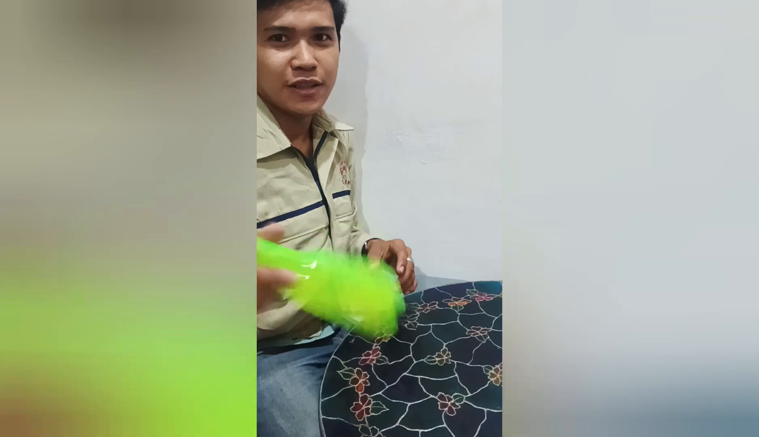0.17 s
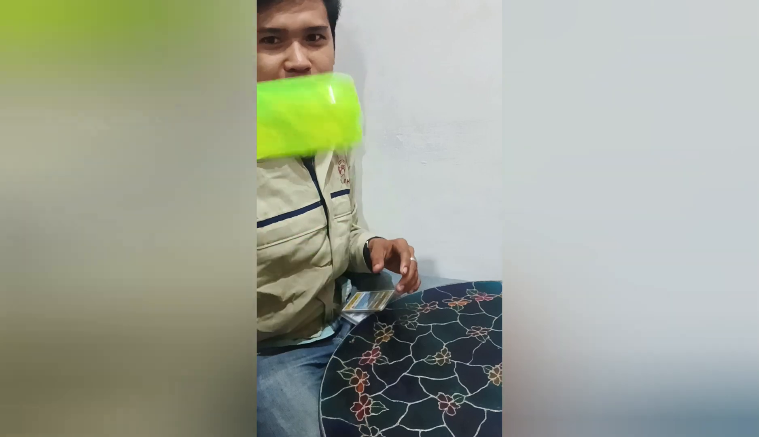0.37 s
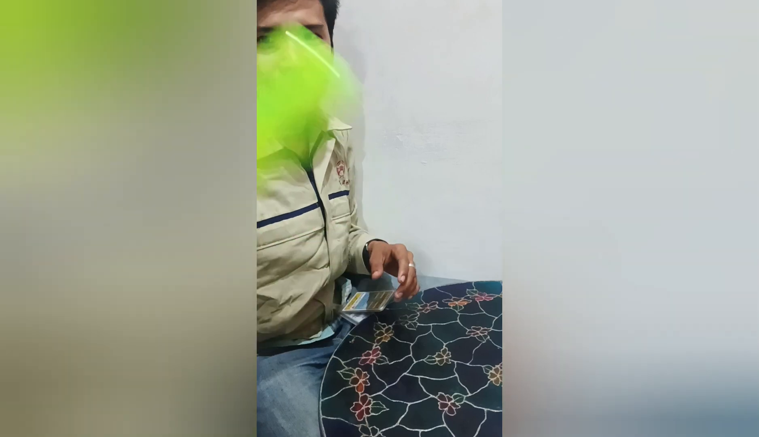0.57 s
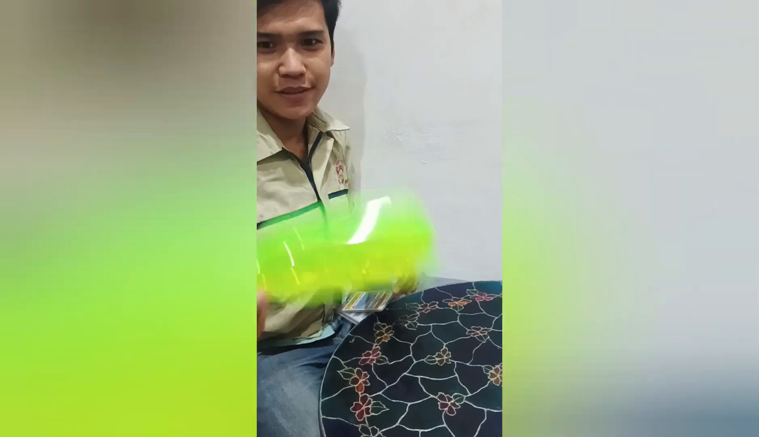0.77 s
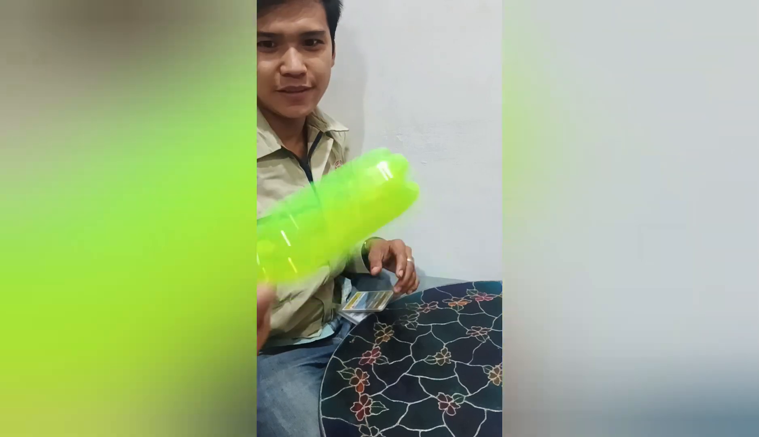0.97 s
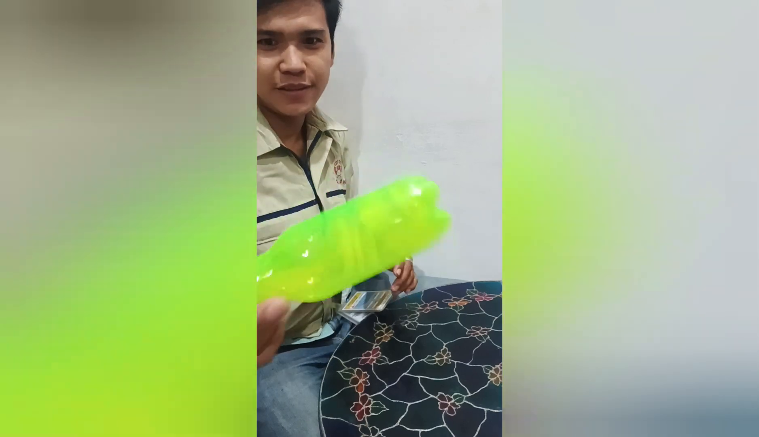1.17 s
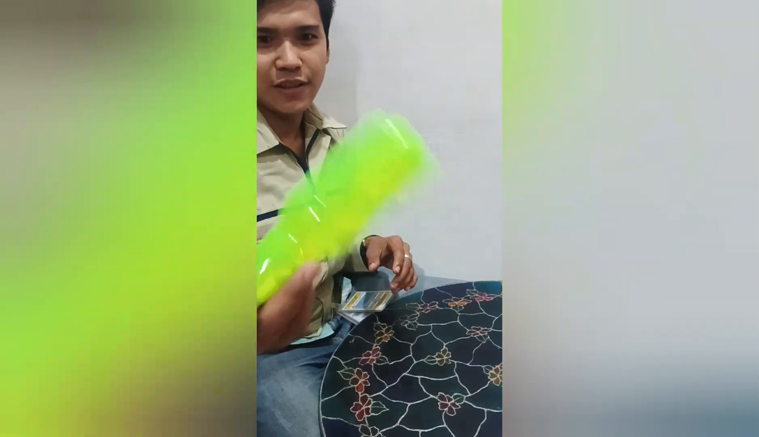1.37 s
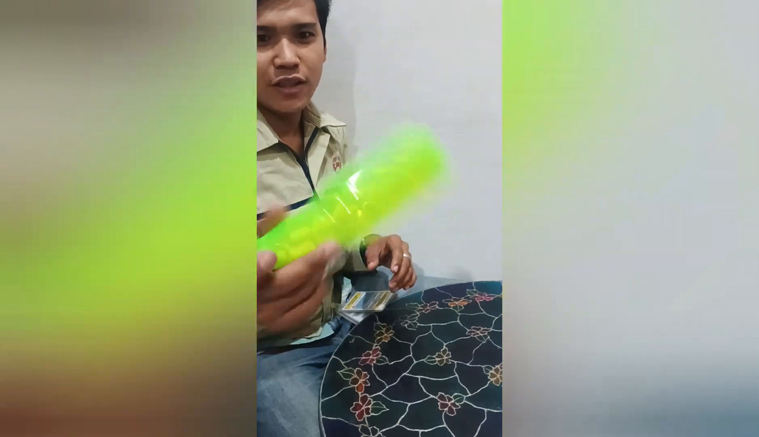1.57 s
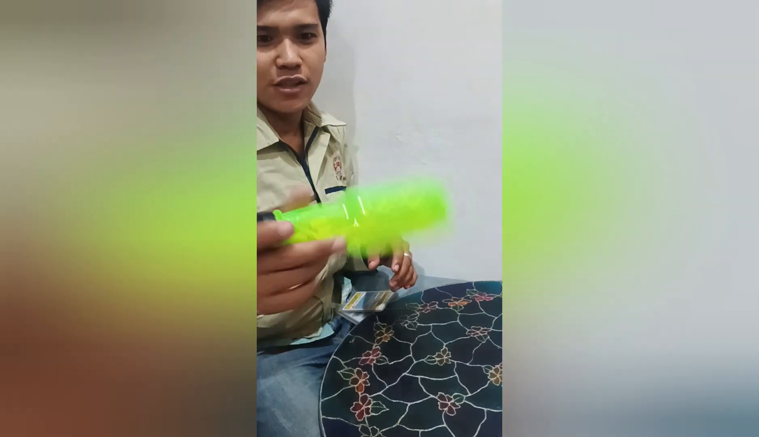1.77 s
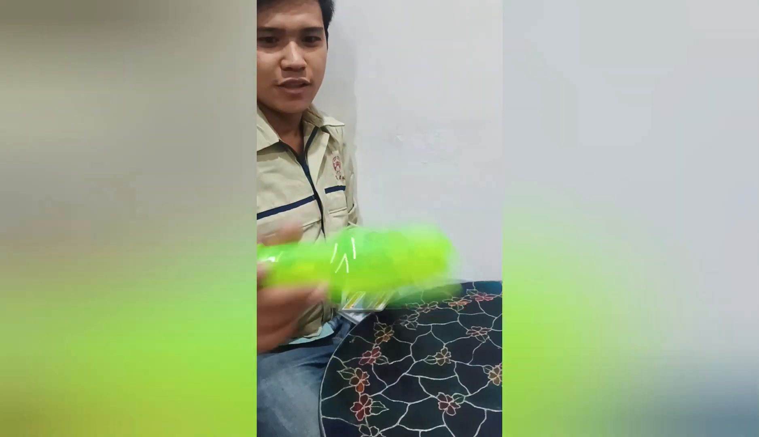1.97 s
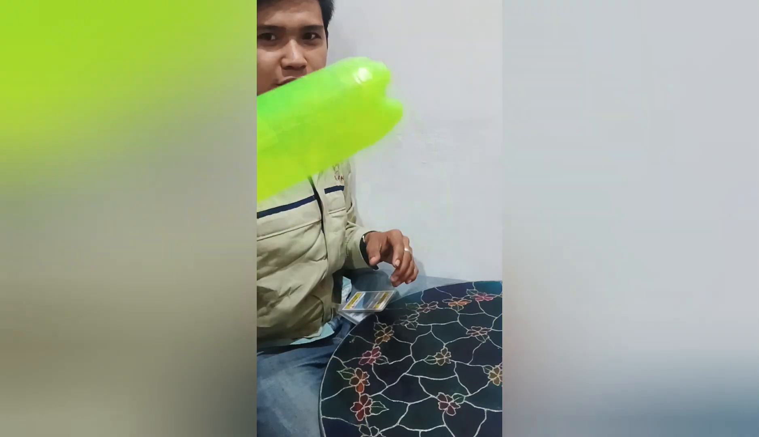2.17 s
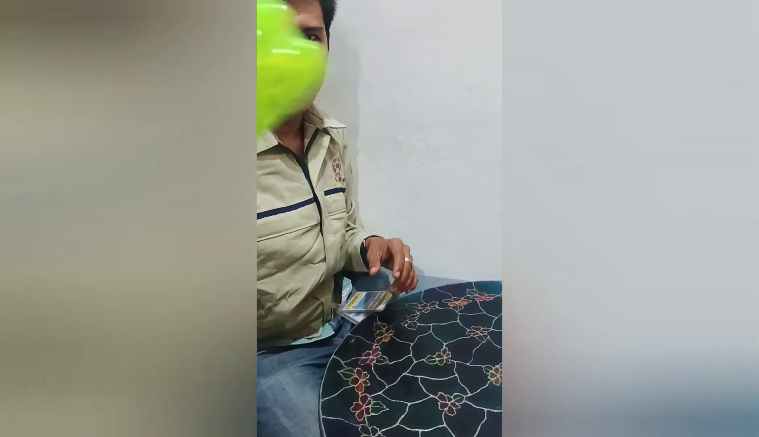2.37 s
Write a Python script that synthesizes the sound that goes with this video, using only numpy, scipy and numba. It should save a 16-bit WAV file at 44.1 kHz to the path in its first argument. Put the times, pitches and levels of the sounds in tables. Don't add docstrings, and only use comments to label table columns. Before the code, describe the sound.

A thin plastic bottle rattles with paper slips, quick uneven shakes from start to end, dense at first, slightly sparser later; close phone microphone, short room reflections, faint motor hum and soft handling nudges behind.

```python
import sys
import numpy as np
from scipy import signal
from scipy.fft import rfft, irfft, next_fast_len
from scipy.io import wavfile
from numba import njit

SR = 44100
rng = np.random.default_rng(int(sys.argv[2]) if len(sys.argv) > 2 else 0)


def put_to_file(sound):
    columns = np.atleast_2d(sound).T
    safe = np.clip(columns, -1, 1)
    whole_steps = np.round(safe * 32767)
    wavfile.write(sys.argv[1], SR, whole_steps.astype(np.int16))


def ratio(d):
    e = np.asarray(d, float) / 20
    return 10 ** e


N = 106854


def shape(x, points):
    points, n = np.array(points, float), next_fast_len(len(x))
    hz = np.maximum(np.fft.rfftfreq(n, 1 / SR), 1)
    gain_db = np.interp(np.log(hz), np.log(points[:, 0]), points[:, 1])
    return irfft(rfft(x, n) * ratio(gain_db), n)[:len(x)]


def tail(t60):
    t = np.arange(SR // 2) / SR
    x = rng.standard_normal(len(t)) * ratio(-60 * t / t60)
    return x / np.sqrt(np.sum(x ** 2))


def walk(rate):
    levels = rng.standard_normal(int(N * rate / SR) + 2)
    return 1.346 * np.interp(np.arange(N) * rate / SR, np.arange(len(levels)), levels)


@njit
def ring(push, turn, keep, soft):
    out, mode, contact, rotation = np.empty(len(push)), 0j, 0j, 0j
    for i in range(len(push)):
        if i % 32 == 0:
            rotation = complex(np.cos(turn[i]), np.sin(turn[i]))
        contact = contact * rotation * soft + push[i] * (1 - soft)
        mode = mode * rotation * keep + contact
        out[i] = mode.imag
    return out


LEAD_DB = -4.5
CLOSE_SLIPS, CHATTER_S, CHATTER_DB = 4, 0.0015, -10
EARLY_S, EARLY_DB = 0.0025, -12
GATHER_S, SETTLE_S, SPREAD_S = 0.004, 0.016, 0.035
SCATTER_DB = 3


def collisions(rows, count=128):
    delay = rng.exponential(size=(len(rows), count))
    luck = np.minimum(rng.exponential(size=(len(rows), count)), 3.5)
    slip = np.arange(count)
    close, early = slip < CLOSE_SLIPS, slip >= count - 2 * CLOSE_SLIPS
    late = delay * np.where(close, CHATTER_S, np.where(early, -EARLY_S, SPREAD_S))
    swarm = ratio(rows[:, 4:5] - 3.0) * np.exp(-late / SETTLE_S) * (1 - np.exp(-late / GATHER_S))
    ahead = ratio(EARLY_DB) * np.exp(late / EARLY_S)
    level = np.where(close, ratio(CHATTER_DB), np.where(early, ahead, swarm))
    strength = ratio(SCATTER_DB * (luck - 0.5)) * level
    late[:, 0], strength[:, 0] = 0, ratio(LEAD_DB)
    at = np.clip(((rows[:, :1] + late) * SR).astype(int), 0, N - 1)
    return at, strength * ratio(rows[:, 1:2])


def pushes(at, strength):
    chance = rng.standard_normal(strength.shape)
    chance[:, 0] = np.sign(chance[:, 0])
    return np.bincount(at.ravel(), (strength * chance).ravel(), N) + 1e-18


CONTACT_S = 0.00041
FLEX, FLEX_PER_S = 0.022, 40
SPOT_DB, DAMP, MODES_DB = 2, 0.84, -9.5


def wall_modes(at, strength, modes, register_db):
    spot = ratio(SPOT_DB * rng.standard_normal((len(at), len(modes))))
    spot = spot / np.sqrt(np.mean(spot ** 2, axis=1)[:, None])
    out = np.zeros(N)
    for k, (hz, mode_db, t60) in enumerate(modes):
        push = pushes(at, strength * spot[:, k:k + 1] * ratio(MODES_DB + register_db + mode_db))
        turn = 2 * np.pi * hz * (1 + FLEX * walk(FLEX_PER_S)) / SR
        contact_s = CONTACT_S * max(2500 / hz, 1)
        out += ring(push, turn, ratio(-60 / (DAMP * t60 * SR)), np.exp(-1 / (contact_s * SR)))
    return out


# frequency in Hz, level in dB.
CRACK_COLOUR = [(500, -25), (1000, -8), (2000, -37), (4300, 15), (5500, -7.5), (10000, -8), (13000, -13),
                (16000, -34)]
CRACK_DB, CRACK_T60_S = 8.5, 0.0069


def dry_crack(at, strength, register_db, edges_hz):
    t = np.arange(2048) / SR
    burst = tail(CRACK_T60_S)[:len(t)] * (1 - np.exp(-t / CONTACT_S))
    x = signal.fftconvolve(pushes(at, strength * ratio(register_db)), burst)[:N]
    x = signal.sosfilt(signal.butter(2, edges_hz, "band", fs=SR, output="sos"), x)
    return ratio(CRACK_DB) * shape(x, CRACK_COLOUR)


# start in
# seconds, then knock, belly, treble and swarm levels in dB.
EARLY_SHAKES = [(0.0054, -38, -11, -30, 5), (0.0373, -14.5, -18.5, -22.5, -8.5),
                (0.0494, -18, -17, -7.5, -9), (0.0892, -21.5, -10.5, -21.5, -5.5),
                (0.1065, -14.5, -6.5, -13.5, -8), (0.177, -29, -16, -18, -5.5),
                (0.1965, -13, -21.5, -17, -5), (0.2843, -27, -14.5, -18.5, -3),
                (0.3845, -25, -27.5, -26.5, -4), (0.5018, -25.5, -26, -13, -6.5),
                (0.5097, -24.5, -16.5, -16, -7), (0.5891, -23, -29, -8, -3.5),
                (0.5891, -16.5, -22, -17, -16), (0.5964, -21, -16.5, -5.5, -9.5),
                (0.619, -26, -16.5, -23, -10), (0.6574, -22, -14, -25, -7.5),
                (0.6694, -17, -14.5, -12.5, -7), (0.7347, -27.5, -12, -22, -11),
                (0.7517, -18, -14, -21, -9), (0.7592, -20, -38, -9, -19)]
MIDDLE_SHAKES = [(0.8011, -20.5, -12.5, -14.5, -3.5), (0.816, -13.5, -14.5, -12, -16.5),
                 (0.8314, -15.5, -11, -16.5, -7.5), (0.8984, -21.5, -12.5, -19, -13.5),
                 (0.9438, -33, -9, -19, 3), (0.9547, -25.5, -7, -15.5, -0.5),
                 (1.0276, -23.5, -31, -26, -25), (1.0385, -23.5, -13.5, -17, -5),
                 (1.0565, -21.5, -14, -11, -8.5), (1.0985, -24, -11, -14.5, 0),
                 (1.1882, -28, -8, -16, -9.5), (1.2032, -11.5, -31, -17, -14.5),
                 (1.2526, -10.5, -31, -15.5, -19), (1.2575, -16.5, -8, -14, -12.5),
                 (1.3404, -27.5, -32, -26, -10), (1.3543, -24, -20, -19.5, -6),
                 (1.3952, -17.5, -30, -13.5, -11), (1.4072, -15, -14.5, -17, -11.5),
                 (1.49, -15, -26, -16.5, -9.5), (1.5565, -22, -9, -20, -5.5)]
LATE_SHAKES = [(1.6247, -42, -30, -37, 2), (1.6452, -28.5, -12, -23.5, -16.5),
               (1.6864, -24.5, -42, -32, -11), (1.6955, -23, -19, -20, -4), (1.7864, -35, -12, -41, -17),
               (1.7985, -18, -16, -12, -6), (1.8826, -34, -16, -20, -6), (1.8966, -29, -16.5, -26, -5),
               (1.9819, -32.5, -32, -35, -11), (2.0108, -22, -13.5, -22.5, -9),
               (2.0218, -19, -18.5, -16.5, -18), (2.1385, -28.5, -19, -24.5, -9),
               (2.153, -23, -20, -38, -27), (2.1974, -25, -29.5, -21, -1), (2.2054, -21, -29, -2.5, -31),
               (2.2268, -24.5, -10.5, -17, -7.5), (2.2368, -19, -17, -31, -12.5),
               (2.2924, -32, -12, -15, -0.5), (2.3007, -10.5, -14, -17, -10.5),
               (2.359, -29.5, -15, -21, -4), (2.3735, -14.5, -12.5, -14, -9.5)]
MORE_SHAKES = [
    (0, -35, -11, -22, -9),
    (.265, -29, -26, -15, -12),
    (0.5804, -20.5, -29, -16.5, -2),
    (.968, -23.5, -14, -18.5, -5),
    (1.2494, -18, -36, -17, -16),
    (1.530, -28.5, -17, -29, -3.5),
    (1.706, -22, -13.5, -19.5, -9.5),
    (2.047, -31, -13, -28, -23),
]
# frequency in Hz, level in dB, decay time t60 in seconds.
BELLY_MODES = [(570, -9, 0.02), (782, -11, 0.039), (1055, -1, 0.024), (1179, 3, 0.037), (1410, 4.5, 0.04),
               (1722, 2, 0.036)]
WALL_MODES = [(2110, -7, 0.057), (2370, -5.5, 0.017), (2606, -7.5, 0.054), (3045, -6, 0.035),
              (3230, -9.5, 0.028), (3708, -8.5, 0.038), (3865, -1, 0.022), (4180, -3.5, 0.015),
              (4397, 0.5, 0.018), (4570, -16.5, 0.015), (4800, -7.5, 0.024), (5130, -10, 0.038),
              (5660, -12.5, 0.022)]
RIB_MODES = [(6137, -1, 0.021), (6554, -0.5, 0.0083), (7200, -1.5, 0.0079), (7830, -5, 0.0088),
             (8610, -4.5, 0.012), (9410, -0.5, 0.0086), (10080, 1, 0.012), (10690, 0.5, 0.0097),
             (11240, -2, 0.0055), (12170, -11, 0.0069), (14500, -15, 0.0096), (15300, -12, 0.0092)]
BELLY_DB, RIBS_DB = 5, 10.5
THIN_HZ = 676


def bottle():
    rows = np.array(list(EARLY_SHAKES) + list(MIDDLE_SHAKES) + list(LATE_SHAKES) + list(MORE_SHAKES), float)
    at, strength = collisions(rows)
    registers = (
        (BELLY_MODES, BELLY_DB + rows[:, 2:3], (400, 1800)),
        (WALL_MODES, 0, (1800, 6000)),
        (RIB_MODES, RIBS_DB + rows[:, 3:4], (6000, 17000)),
    )
    out = np.zeros(N)
    for modes, register_db, edges_hz in registers:
        out += wall_modes(at, strength, modes, register_db)
        out += dry_crack(at, strength, register_db, edges_hz)
    return signal.sosfilt(signal.butter(4, THIN_HZ, "high", fs=SR, output="sos"), out)


# time in seconds, level in dB.
RUSTLE_LEVEL = [(0, -44), (.03, -51.5), (.1, -46), (.19, -52), (.31, -51), (.35, -74), (.57, -84),
                (.6, -40.5), (.72, -50.5), (.85, -47), (1.12, -63), (1.16, -77), (2.42, -82)]
# frequency in Hz, level in dB.
PAPER_COLOUR = [(800, -19), (1500, -9.5), (4300, 0), (6500, -6.5), (10500, -9), (13000, -16), (15500, -13)]
RUSTLE_SCATTER_DB = 3.5


def rustle():
    luck = np.minimum(rng.exponential(size=N // 32 + 1), 3)
    ticks = rng.standard_normal(N) * ratio(RUSTLE_SCATTER_DB * np.repeat(luck, 32)[:N])
    x = shape(ticks, PAPER_COLOUR)
    level_db = np.interp(np.arange(N) / SR, *np.array(RUSTLE_LEVEL).T)
    return x / x.std() * ratio(level_db + 0.83 * walk(40.24))


HUM_HZ, WOBBLE_DB = 120.27, 3
# multiple of the hum frequency, level in dB.
HUM_PARTIALS = [(1, -68), (1.148, -71), (2, -80), (3, -70.5), (5, -75), (17, -69), (23, -61.5), (27, -57)]
# time in seconds, level in dB.
WHINE_FADE = [(0, 0), (.38, -5), (.44, 1.5), (.95, 3.5), (1.35, 4), (1.7, -14), (2.1, -3.5), (2.42, -18)]


def appliance():
    t = np.arange(N) / SR
    whine_db = np.interp(t, *np.array(WHINE_FADE).T)
    out = np.zeros(N)
    for multiple, db in HUM_PARTIALS:
        level_db = db + 2.0 + WOBBLE_DB * walk(30.23) + (multiple > 9) * whine_db
        drift = np.minimum(multiple, 4) * 0.059 * walk(25)
        cycles = multiple * HUM_HZ * t + rng.random() + drift
        out += ratio(level_db) * np.sin(2 * np.pi * cycles)
    return out


# frequency in Hz, level in dB.
AIR_COLOUR = [(30, -26), (70, -12.5), (140, -6.5), (220, -7), (400, -11), (1500, -17.5), (5000, -32),
              (9000, -42)]
AIR_DB = -66.5


def air():
    x = shape(rng.standard_normal(N), AIR_COLOUR)
    return x / x.std() * ratio(AIR_DB + 2.3 * walk(7.3))


ROOM_DB, ROOM_T60_S, ROOM_TREBLE_T60_S = -8, 0.24, 0.11


def room(near):
    low = signal.butter(2, 4500, "low", fs=SR, output="sos")
    high = signal.butter(2, 4500, "high", fs=SR, output="sos")
    echo = signal.sosfilt(low, tail(ROOM_T60_S)) + signal.sosfilt(high, tail(ROOM_TREBLE_T60_S))
    return ratio(ROOM_DB) * signal.fftconvolve(near, echo)[:N]


# start in seconds, level in dB, frequency in Hz, decay time t60 in seconds.
SNAP_EVENTS = [(0.038, -10, 3550, 0.013), (.0398, -8.5, 4930, 0.0076), (0.0527, -14, 4620, 0.012),
               (0.109, -9.5, 4370, 0.011), (0.1967, -11, 3890, .008), (.1992, -9.5, 4440, .012),
               (.2064, -20, 4430, .012), (0.3853, -27, 4380, 0.017), (.5891, -18, 2110, 0.014),
               (0.5961, -16.5, 4500, 0.014), (.619, -16, 4570, 0.014), (.6684, -11, 3680, 0.0095),
               (.6744, -14.5, 2630, 0.014), (.7517, -18.5, 4460, 0.026), (0.7593, -15, 4300, 0.015),
               (0.8012, -16.5, 3600, 0.013), (.816, -15, 3760, 0.024), (0.8322, -13, 4390, 0.012),
               (1.038, -21, 4630, 0.015), (1.0457, -17, 4400, 0.015), (1.0565, -10.5, 3830, 0.0099),
               (1.2029, -8.5, 4230, 0.022), (1.2505, -13, 4560, .008), (1.2529, -11.5, 4404, 0.016),
               (1.3959, -3, 4450, 0.0075), (1.4064, -7.5, 4380, .012), (1.49, -12, 4400, 0.021),
               (1.5593, -22, 4320, 0.016), (1.6875, -17, 4350, .015), (1.6956, -18, 3850, 0.026),
               (1.7986, -15.5, 4480, 0.011), (1.8029, -12.5, 4410, 0.013), (1.9831, -21.5, 3990, 0.019),
               (2.0221, -22.5, 4390, 0.014), (2.1975, -17.5, 4230, 0.018), (2.2045, -16.5, 4510, 0.027),
               (2.3012, -11, 4305, 0.015), (2.3735, -11.5, 2130, 0.014), (2.3837, -14, 2110, 0.0096)]
SNAP_DB, SNAP_RISE_S, SNAP_TICK_DB = -1.5, 0.00042, -9
SNAP_PAIR, SNAP_PAIR_DB = 1.16, -7


def snaps():
    out, t = np.zeros(N + 2048), np.arange(2048) / SR
    for start, db, hz, t60 in SNAP_EVENTS:
        x = np.sin(2 * np.pi * hz * t)
        x = x + ratio(SNAP_PAIR_DB) * np.sin(2 * np.pi * hz * t / SNAP_PAIR)
        x = x + ratio(SNAP_TICK_DB) * shape(rng.standard_normal(len(t)), PAPER_COLOUR)
        decay = ratio(db + SNAP_DB - 60 * t / max(t60, 0.003))
        at = int(start * SR)
        out[at:at + len(t)] += decay * (1 - np.exp(-t / SNAP_RISE_S)) * x
    return out[:N]


# centre in seconds, level in dB, frequency in Hz, length in seconds.
NUDGES = [
    (.55, -60, 110, .03),
    (2.14, -54.5, 110, 0.016),
    (2.14, -48.5, 260, 0.017),
    (2.17, -54, 530, .015),
    (2.10, -55, 350, .025),
    (1.9, -59, 240, 0.036),
]


def bumps():
    t = np.arange(N) / SR
    out = np.zeros(N)
    for centre, db, hz, length in NUDGES:
        keep = 1 - 2 * hz / SR
        thud = ring(rng.standard_normal(N), np.full(N, 2 * np.pi * hz / SR), keep, keep)
        out += ratio(db - 19) * np.exp(-((t - centre) / length) ** 2) * thud
    return out


def scene():
    near = bottle() + rustle() + snaps()
    return (near + room(near) + appliance() + air() + bumps())[None]


def band_limit(x):
    return signal.sosfilt(signal.butter(12, 16830, fs=SR, output="sos"), x)


TOP_HZ = 15900


def record(dry):
    mix = signal.sosfilt(signal.ellip(8, 0.2, 40, TOP_HZ, fs=SR, output="sos"), dry)
    return band_limit(mix)


dry = scene()
out = record(dry)
put_to_file(out)
```